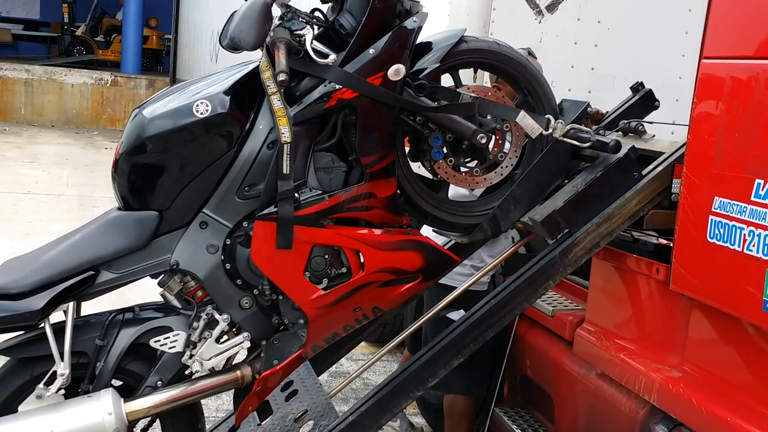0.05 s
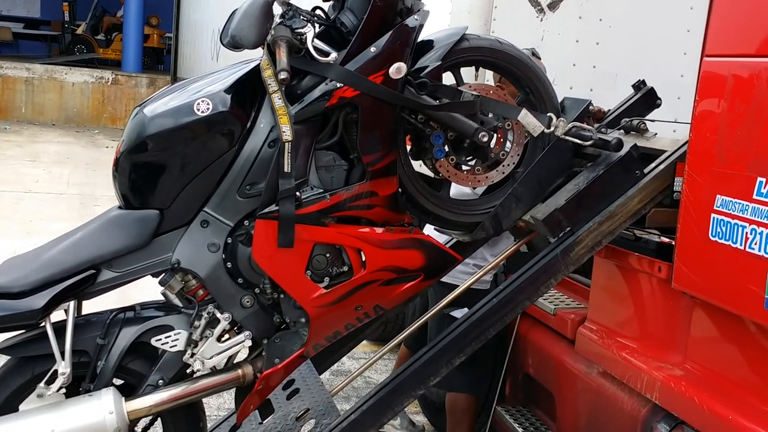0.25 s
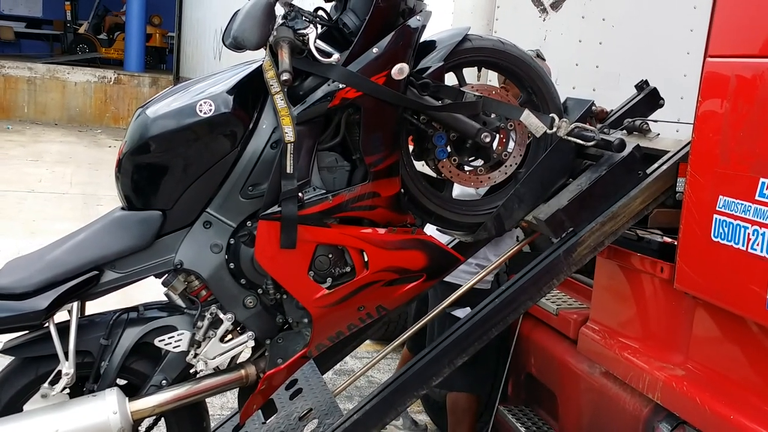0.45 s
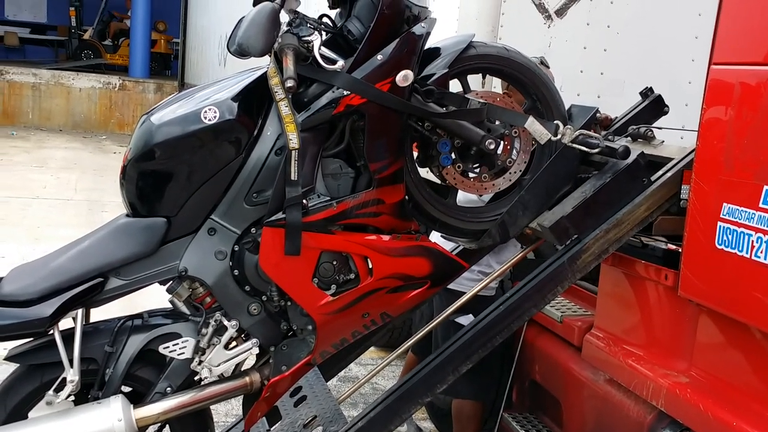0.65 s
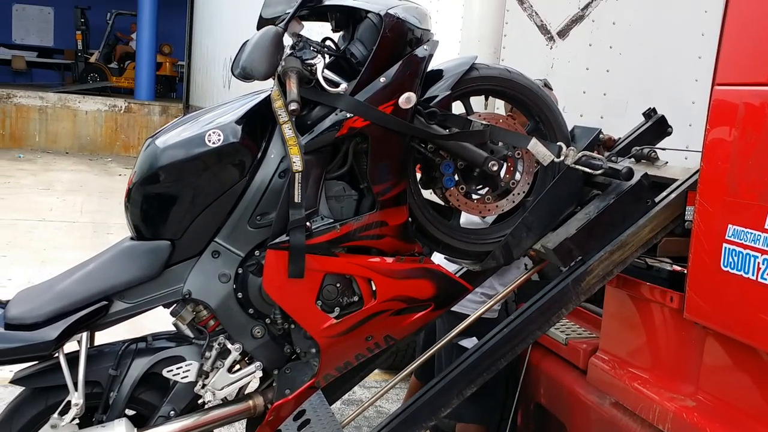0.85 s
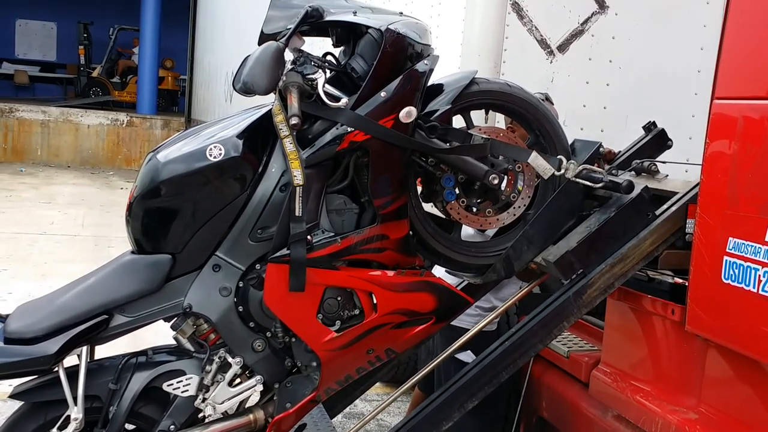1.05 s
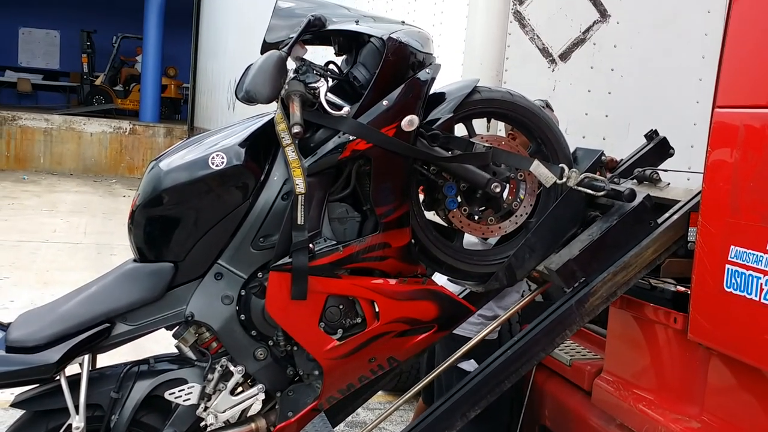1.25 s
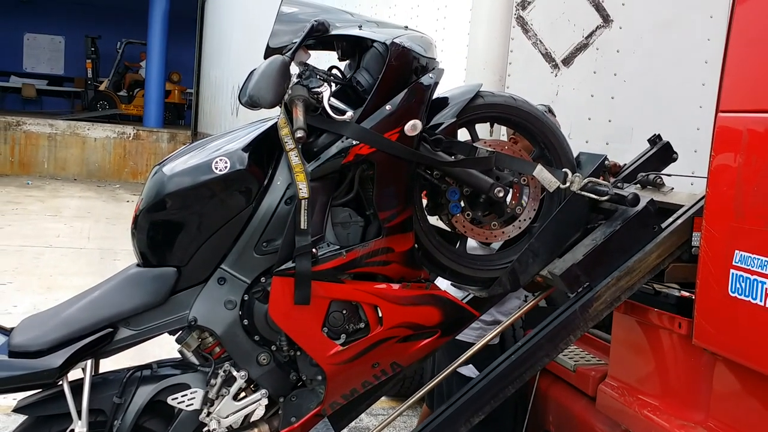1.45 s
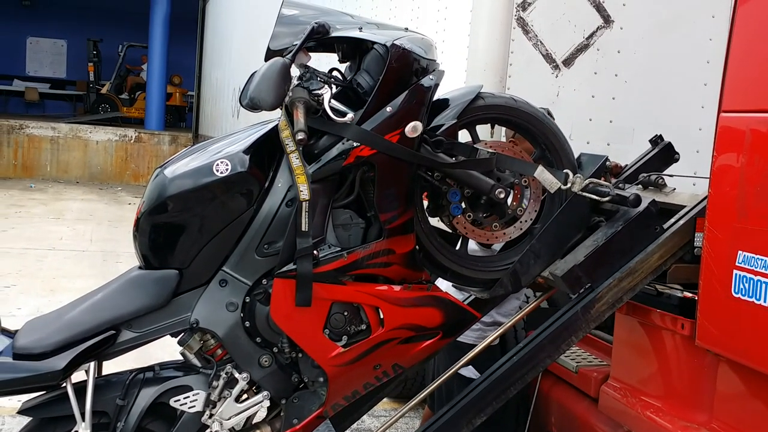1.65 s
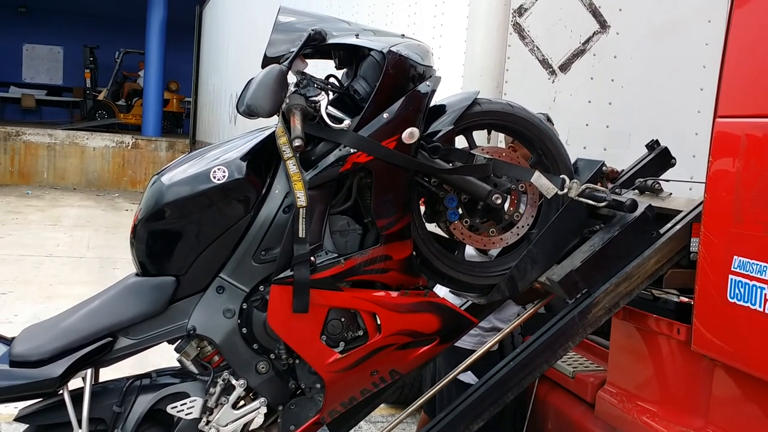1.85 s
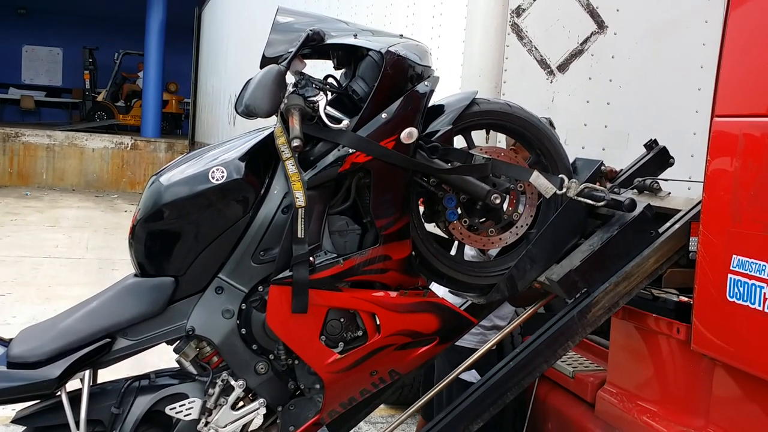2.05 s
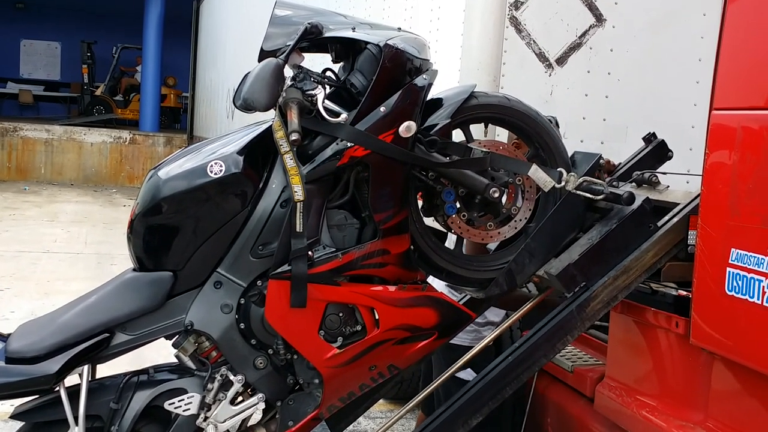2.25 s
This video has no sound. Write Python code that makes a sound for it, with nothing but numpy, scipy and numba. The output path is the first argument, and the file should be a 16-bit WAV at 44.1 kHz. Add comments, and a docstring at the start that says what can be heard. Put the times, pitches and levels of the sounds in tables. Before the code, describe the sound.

A steel lift holding a motorcycle scrapes and knocks faintly, then drops into place with one loud, chattering clank that echoes briefly around a yard. Wind rumbles on the microphone over faint distant traffic.

```python
"""Motorcycle dropping on a steel lift

A motorcycle hangs on a steel lift behind a truck. The lift shifts with faint scrapes and knocks, then
drops into place: a quick cluster of chattering steel blows that ring the frame and echo round the yard.
Wind rumbles on the phone over distant traffic; its gain control ducks at the clank and recovers slowly."""
import sys
import numpy as np
from scipy import signal
from scipy.fft import rfft, irfft
from scipy.io import wavfile
from scipy.ndimage import uniform_filter1d
from numba import njit

SR = 44100
rng = np.random.default_rng(int(sys.argv[2]) if len(sys.argv) > 2 else 0)


def bounce(signal):
    """Save signal as a 16-bit WAV file at the path given by the first command-line argument."""
    frames = np.transpose(np.atleast_2d(signal))
    limited = np.clip(frames, -1, 1)
    pcm = np.round(limited * 32767).astype(np.int16)
    wavfile.write(sys.argv[1], SR, pcm)


N = 105840

# wind colours, deep buffeting and higher rumble: f/Hz, level/dB
BUFFET_COLOUR = [(25, -45), (36, -24), (50, 12), (65, 18), (95, 22), (125, 8), (200, -78)]
RUMBLE_COLOUR = [(70, -37.5), (105, -3.5), (126, 6.5), (145, 4), (175, 3), (210, -11), (255, -8.5),
                 (320, -16), (450, -27.5), (900, -58)]
# gusts riding each wind layer: t/s, level/dB
BUFFET_GUSTS = [(0.0, -60), (0.038, -39), (0.122, -49), (0.168, -41), (0.286, -20.5), (0.332, -34),
                (0.352, -30), (0.406, -34.5), (0.46, -18), (0.544, -32), (0.876, -28), (0.97, -43),
                (1.03, -28.5), (1.056, -33), (1.084, -30), (1.164, -24.5), (1.298, -36), (1.64, -27),
                (1.656, -37.5), (1.78, -29), (1.82, -40), (2.0, -34.5), (2.13, -32.5), (2.2, -38),
                (2.4, -38)]
RUMBLE_GUSTS = [(0.0, -39.5), (0.172, -39.5), (0.218, -26), (0.336, -29), (0.356, -30), (0.524, -29.5),
                (0.54, -24), (0.678, -22), (0.704, -31.5), (0.752, -22), (0.886, -26.5), (0.922, -22),
                (1.01, -30), (1.066, -17.5), (1.104, -27.5), (1.134, -21.5), (1.238, -28), (1.398, -24.5),
                (1.446, -29.5), (1.496, -20.5), (1.704, -28), (1.78, -26.5), (1.82, -25), (1.98, -28),
                (2.065, -24.5), (2.15, -29), (2.2, -34), (2.4, -33)]
# traffic colour, low end and the wash above it: f/Hz, level/dB
TRAFFIC_LOWS = [(30, -39), (100, -26), (250, 7)]
TRAFFIC_WASH = [(400, -4.5), (550, -7), (800, -5), (1200, -9.5), (1500, -10.5), (1800, -7), (2200, -15),
                (2800, -24), (4300, -26.5), (5400, -28.5), (6400, -27.5), (8300, -30.5), (10500, -36),
                (12000, -41), (14000, -36)]
# how alike both ears hear the traffic: f/Hz, shared power/fraction
TRAFFIC_LIKENESS = [(200, 1), (700, 0.22), (1500, 0.68), (3000, 0.39), (8000, 0.085)]
# slips of the load: t/s, level/dB, attack/s, decay/s, grind over hiss/dB
SLIPS = [(.325, -45.5, 0.032, 0.35, -4), (0.373, -47, 0.012, 0.02, 13), (.69, -46, 0.046, 0.31, -32),
         (0.798, -40, .004, 0.16, -1.5), (.85, -53, 0.028, 0.27, 10.5)]
# friction colour: f/Hz, level/dB
SCRAPE_COLOUR = [(300, 2), (1000, -1.5), (2000, 2.5), (2800, -6.5), (4500, -1), (6300, -0.5), (7500, -5.5),
                 (10000, -10), (14000, -27)]
# knocks, then the drop: t/s, level/dB, thud/dB, bite/dB, brightness/dB, chatter decay/s, mode push/dB
STEEL_BLOWS = [(0.381, -35.5, 12.5, 4, -5, .028, 2), (0.465, -36.5, 0, -15, 0, .004, 6),
               (0.801, -34.5, -4, -13, 7.5, 0.011, -3), (1.7936, -14, -13, -14, -1, 0.0036, -2),
               (1.7970, -5, -3, 6, 3, 0.0037, -4), (1.8018, -1, -12, 0.5, 0, .009, 3.5),
               (1.8120, 0.5, 4, 0, 2.5, 0.013, 1.5), (1.8260, -3, 8, -3, 3.5, 0.0053, -0.5),
               (1.8567, 2, -1.5, -3, 2, 0.0052, 0), (1.866, -1.5, -33, -4, 5.5, 0.021, 2),
               (1.886, 1, 5.5, -1, -5.5, 0.0047, 2), (1.901, -3.5, -6, 1.5, 1, 0.01, -1.5),
               (1.9476, -5, -1, -1, 7, 0.0034, -5), (1.954, -2.5, -13, -8, 2.5, 0.005, 0),
               (1.964, -2, 1, -3.5, -0.5, 0.011, 5), (1.995, -20, -7, -2, -27, .012, 6)]
# colour of the steel's crowd of short modes: f/Hz, level/dB
CLANG_COLOUR = [(150, -12), (350, -2.5), (700, -6), (1100, -3), (1450, 4.5), (1850, -1), (2200, 2),
                (2500, -2), (2750, -10), (3150, -1), (3400, -4.5), (3800, -1.5), (4600, -1), (5000, -3),
                (6300, 3.5), (7200, -3), (8000, -1), (10500, -8), (14000, -19)]
# ring time of that crowd: f/Hz, t60/s
CLANG_DECAY = [(300, 0.27), (1800, 0.3), (4000, 0.13), (12000, 0.12)]
# clear modes of the lift frame: f/Hz
FRAME_PITCHES = [900, 1110, 1368, 1413, 1534, 1631, 1771, 2073, 2160, 2212, 2305, 3105, 4616, 5994, 6146,
                 6270, 6428, 6740]
# ring of each clear mode: level/dB, t60/s
FRAME_RING = [(-7, 0.26), (-6.5, 0.24), (-11.5, 0.15), (1, 0.13), (-8, 0.18), (1, .24), (-6, .2), (4, 0.31),
              (-4, 0.32), (-6, 0.19), (-7.5, 0.17), (-7.5, 0.33), (-8, 0.18), (-4, 0.15), (1, .16),
              (-4, 0.11), (-20, 0.19), (-4, 0.18)]
# reverb time of the yard: f/Hz, t60/s
YARD_DECAY = [(300, 0.98), (2000, 1), (6000, 0.78), (12000, 0.29)]
# colour of the microphone ports: f/Hz, left minus right level/dB
PORT_BALANCE = [(200, 0), (1200, -2), (2250, -2.5), (3100, 9), (4500, 2.5), (6400, 10.5), (8000, -2.5),
                (9500, -3.5), (11000, -4.5), (13000, 2.5)]


def undb(db):
    """Decibels to gain."""
    return 10 ** (np.asarray(db) / 20)


def along(points, hz):
    """Read a curve on a log-frequency axis."""
    freqs, values = np.array(points, float).T
    return np.interp(np.log(np.maximum(hz, 1)), np.log(freqs), values)


def bins(size=N):
    """Frequencies of a spectrum, in Hz."""
    return np.fft.rfftfreq(size, 1 / SR)


def noise(colour, channels=2, size=N):
    """Unit-level coloured noise, unrelated between channels."""
    white = rfft(rng.standard_normal((channels, size)))
    y = irfft(white * undb(along(colour, bins(size))), size)
    return y / y.std()


def drift(rate_hz):
    """Smooth random wander with a spread of 1."""
    y = irfft(rfft(rng.standard_normal(N)) * np.exp(-(bins() / rate_hz) ** 2), N)
    return (y - y.mean()) / y.std()


def add(out, start, x):
    """Mix a sound in at a time in seconds."""
    i = int(start * SR)
    out[..., i:i + x.shape[-1]] += x[..., :N - i]


def ring(x, response):
    """Pass a sound through a stereo response."""
    return signal.fftconvolve(np.atleast_2d(x), response, axes=1)[:, :N]


def tail(colour, t60s, accent=((1, 0),), size=SR):
    """Stereo ring of countless close modes, each octave dying at its own rate; the accent is an EQ."""
    t, f, out, energy = np.arange(size) / SR, bins(size), 0, 0
    source = rfft(noise(colour, size=size))
    power = np.abs(source) ** 2
    octaves = 125 * 2. ** np.arange(8)
    for hz, pick in zip(octaves, np.eye(len(octaves))):
        band = along(list(zip(octaves, pick)), f)
        fade = np.exp(-np.log(1000) * t / along(t60s, hz))
        out = out + irfft(source * band * undb(along(accent, f)), size) * fade
        energy += np.sum(power * band) / np.sum(power) * np.sum(fade ** 2)
    return out / np.sqrt(energy)


def from_left(x, lead_s=0.00031):
    """The sound reaches the left port just before the right."""
    return irfft(rfft(x) * np.exp(-2j * np.pi * bins() * np.array([[0], [lead_s]])), N)


def wind(side_db=-22):
    """Gusts round the truck make a deep buffeting and a higher rumble, nearly alike in both ears."""
    t, out = np.arange(N) / SR, 0
    for colour, gusts, trim_db in ((BUFFET_COLOUR, BUFFET_GUSTS, 1), (RUMBLE_COLOUR, RUMBLE_GUSTS, 1.5)):
        mid, side = noise(colour)
        power = uniform_filter1d(uniform_filter1d(mid ** 2, size=2200), size=900)
        mid = mid / np.sqrt(power)  # levelled, so the gusts shape the swells
        width = undb(side_db) * side * np.array([[1], [-1]])
        gust = undb(trim_db + np.interp(t, *np.array(gusts).T))
        out = out + gust * (from_left(mid) + width)
    return signal.sosfilt(signal.butter(4, 38, "high", fs=SR, output="sos"), out)


def traffic(level_db=-36.5, swell_db=.35):
    """A smooth distant wash from the left, more diffuse in the treble."""
    colour = TRAFFIC_LOWS + TRAFFIC_WASH
    share = np.clip(along(TRAFFIC_LIKENESS, bins()), 0, 1)
    common = rfft(from_left(noise(colour, channels=1)))
    diffuse = rfft(noise(colour))
    wash = irfft(np.sqrt(share) * common + np.sqrt(1 - share) * diffuse, N)
    return wash * undb(level_db + swell_db * drift(rate_hz=2))


def scrapes(grind_hz=1560, flutter_db=1.3):
    """The load slides a little: hissy, uneven friction over a low grind, swelling and fading."""
    t, out = np.arange(N) / SR, 0
    lowpass = signal.butter(2, grind_hz, "low", fs=SR, output="sos")
    for start, db, attack, decay, grind_db in SLIPS:
        rise = np.clip((t - start) / attack, 0, 1)
        fall = np.exp(-np.maximum(t - start - attack, 0) / decay)
        hiss = noise(SCRAPE_COLOUR)
        grind = signal.sosfilt(lowpass, noise(SCRAPE_COLOUR))
        out = out + undb(db) * rise * fall * (hiss + undb(grind_db) * grind / grind.std())
    return out * undb(flutter_db * drift(rate_hz=90))


def contact(decay_s, size, hits_per_s=1500, chatter_db=2.5):
    """Steel meets steel: one hard hit and a dying chatter of small ones."""
    hits = rng.standard_normal(size) * (rng.random(size) < hits_per_s / SR)
    hits *= np.exp(-np.arange(size) / SR / decay_s)
    hits *= undb(chatter_db) / np.sqrt(np.sum(hits ** 2) + 1e-9)
    hits[0] = 1
    return hits


def clank(clang_db=11.5, frame_db=-39, crack_db=-2, crack_s=0.0017, size=24000):
    """Each blow lands on another spot: a crack, a clang of short modes, a push to the clear modes."""
    thud_hz, bite_hz, pivot_hz, bright_hz = 620, 1380, 2030, 5500
    selectivity = 1.7  # how strongly the struck spot picks among the clear modes
    t, modes = np.arange(size) / SR, len(FRAME_PITCHES)
    clang, frame = np.zeros((2, N)), np.zeros((modes, N), complex)
    mode_db, t60 = np.array(FRAME_RING).T
    rings = np.exp((2j * np.pi * np.array(FRAME_PITCHES) - np.log(1000) / t60)[:, None] * t)
    crack = 1 + undb(crack_db) * np.exp(-t / crack_s)
    for start, db, thud_db, bite_db, bright_db, chatter_s, push_db in STEEL_BLOWS:
        accent = [(thud_hz, thud_db), (bite_hz, bite_db), (pivot_hz, 0), (bright_hz, bright_db)]
        body = tail(CLANG_COLOUR, CLANG_DECAY, accent, size) * crack
        add(clang, start, undb(db + clang_db) * ring(contact(chatter_s, size), body))
        push = undb(db + push_db + selectivity * along(accent, FRAME_PITCHES))
        phase = np.exp(2j * np.pi * rng.random(modes))
        add(frame, start, (push * phase)[:, None] * rings)
    gain = undb(frame_db + mode_db) / frame.real.std(axis=1)  # sets each mode's average level
    ear_phase = np.exp(.7j * rng.standard_normal((2, modes)))
    return clang + ((ear_phase * gain) @ frame).real


def yard(x, wet_db=-19, build_s=.025):
    """Truck side and yard walls return a soft echo."""
    bloom = 1 - np.exp(-np.arange(SR) / SR / build_s)
    echo = tail(colour=[(100, -15.5), (7000, -8), (14000, -9)], t60s=YARD_DECAY) * bloom
    return undb(wet_db) * ring(x, echo)


def scene():
    """The lift and its yard echo over a bed of wind and traffic."""
    steel = clank() + scrapes()
    return steel + yard(steel) + wind() + traffic()


@njit
def follow(x, attack_s, release_s):
    """Envelope follower with separate rise and fall times."""
    out, level = np.empty(len(x)), 0.
    for i in range(len(x)):
        level += (x[i] - level) / (SR * (attack_s if x[i] > level else release_s))
        out[i] = level
    return out


def record(dry, threshold_db=-13.5, window_s=0.0203, ceiling=.9, top_hz=14200):
    """The phone: port colour, gain control that ducks on loud sound, rounded peaks and a top cut."""
    ports = undb(along(PORT_BALANCE, bins()) * np.array([[.5], [-.5]]))
    x = irfft(rfft(dry) * ports, N)
    power = uniform_filter1d(np.mean(x ** 2, axis=0), int(window_s * SR) + 1)
    held = follow(np.sqrt(np.abs(power)), attack_s=0.0014, release_s=2.7)
    x = x / np.maximum(held / undb(threshold_db), 1)
    x = x / (1 + (x / ceiling) ** 4) ** .25  # soft clip
    return signal.sosfilt(signal.ellip(8, .2, 70, top_hz, fs=SR, output="sos"), x)


dry = scene()
out = record(dry)
bounce(out)
```